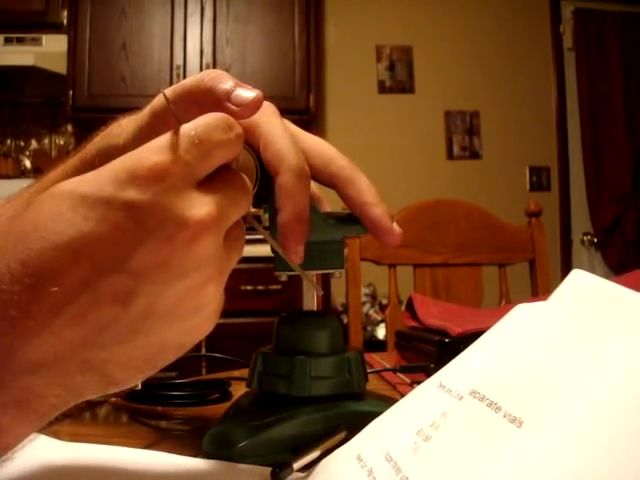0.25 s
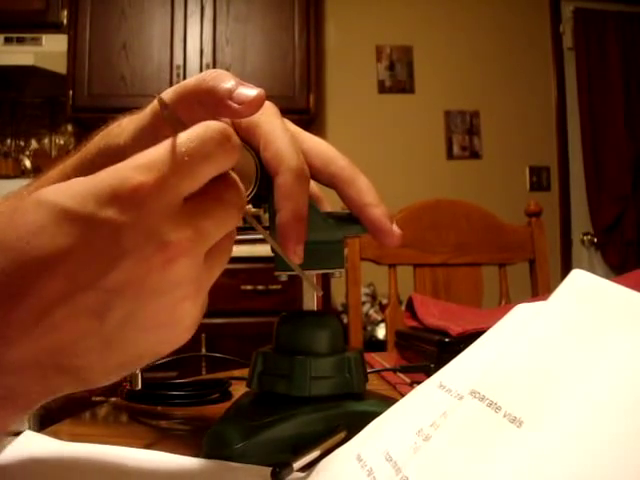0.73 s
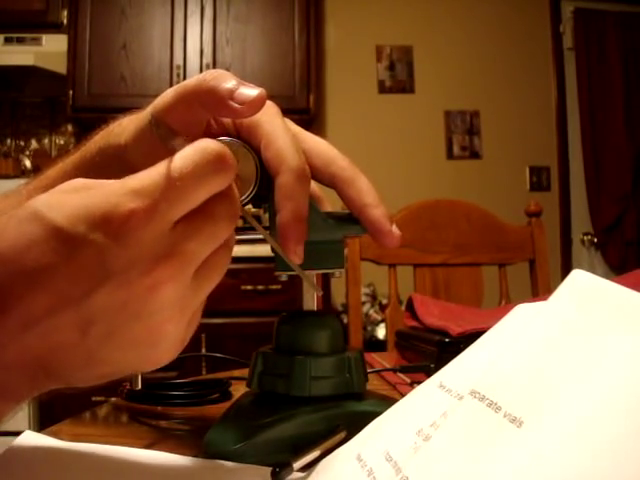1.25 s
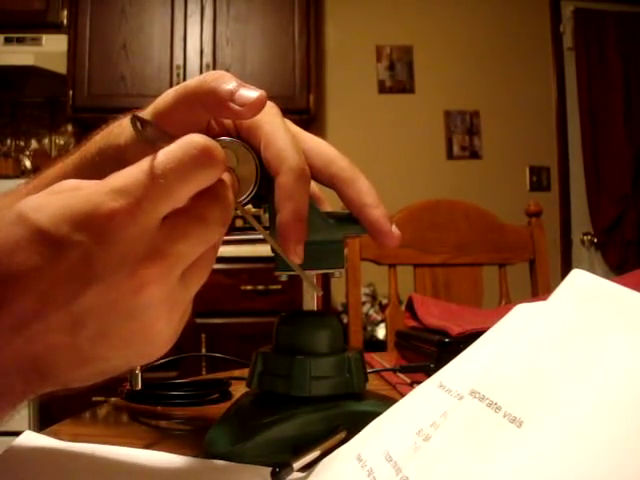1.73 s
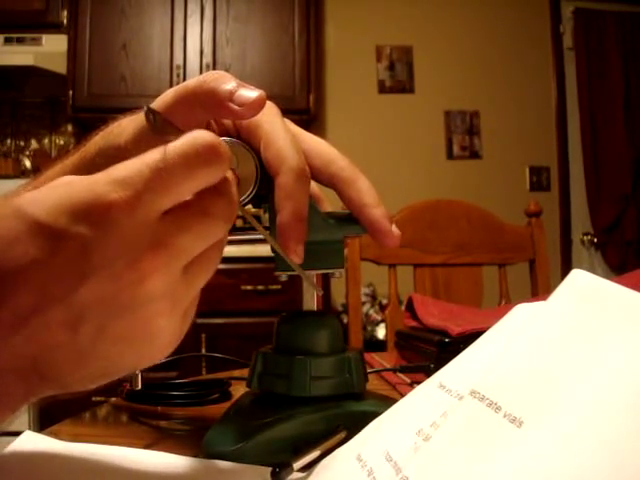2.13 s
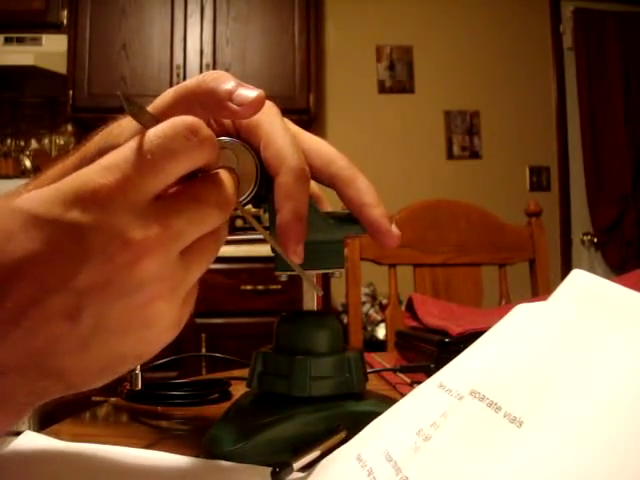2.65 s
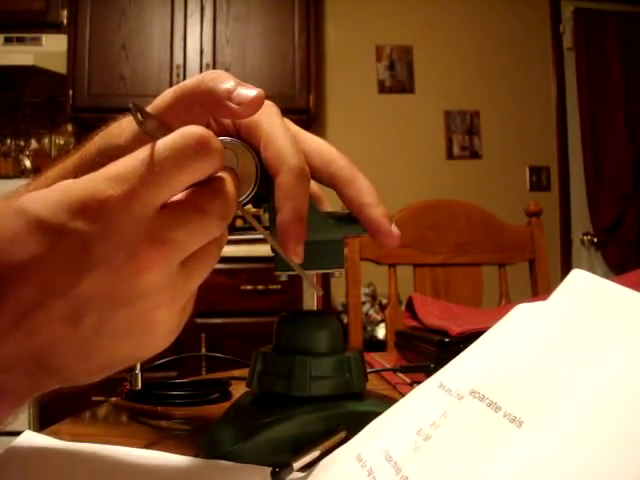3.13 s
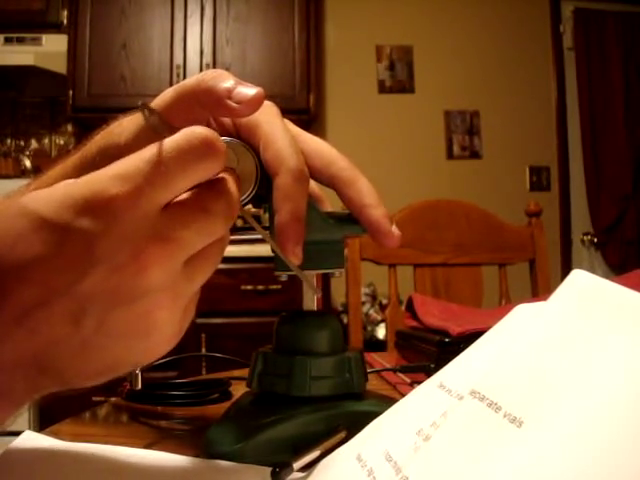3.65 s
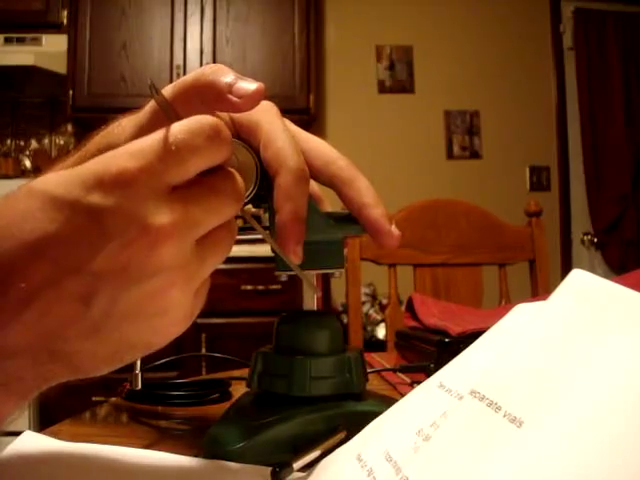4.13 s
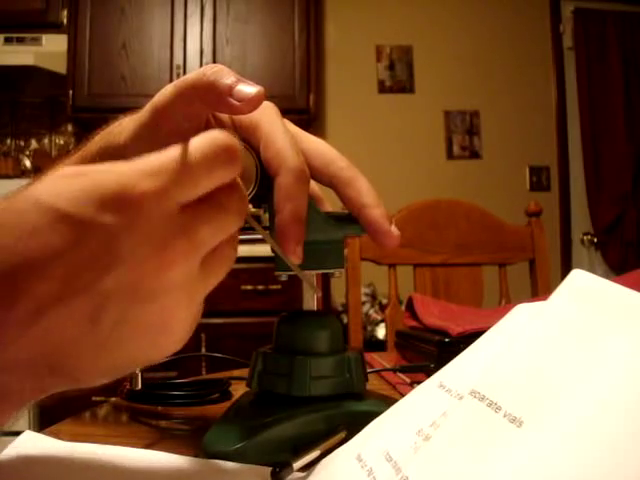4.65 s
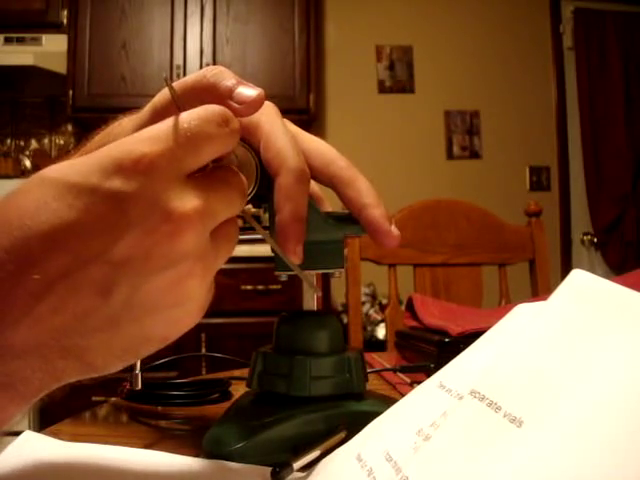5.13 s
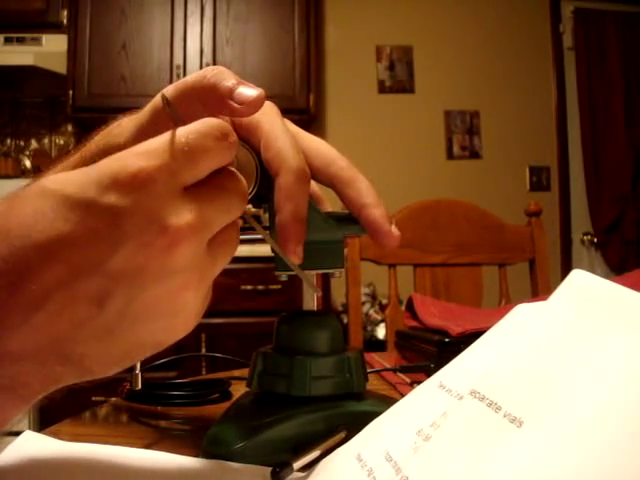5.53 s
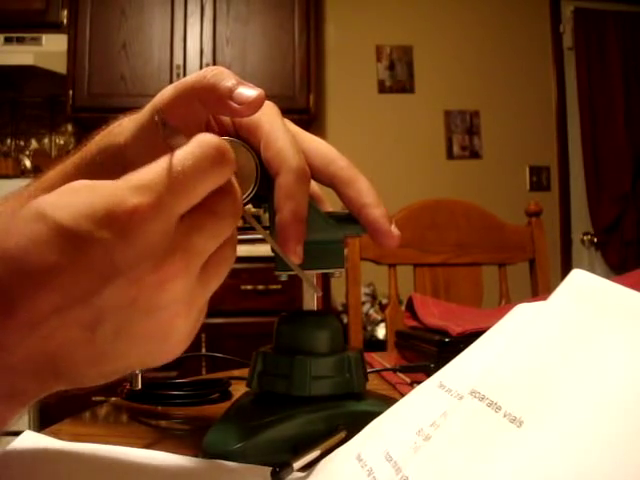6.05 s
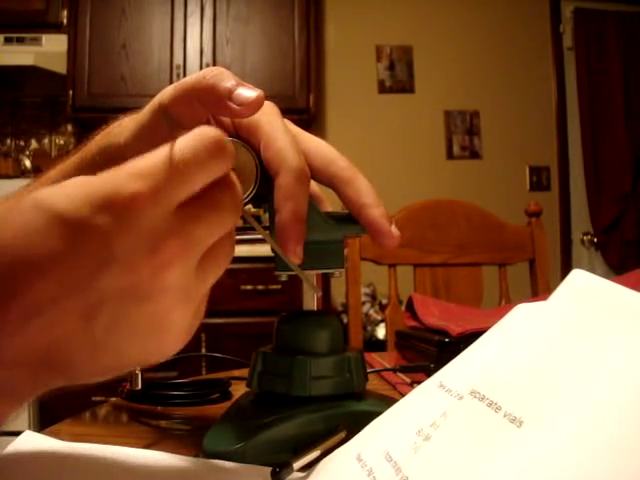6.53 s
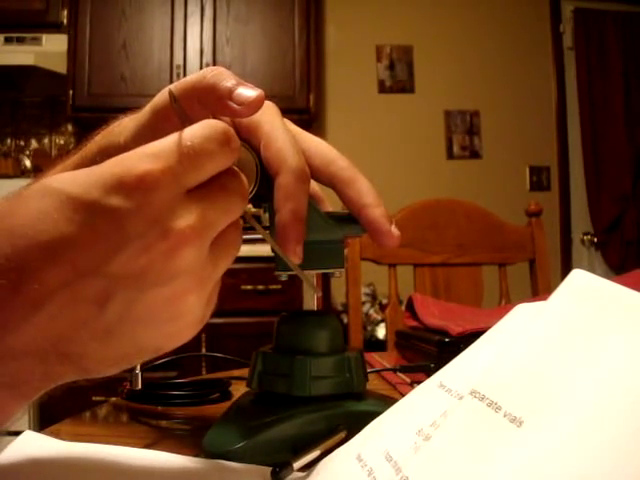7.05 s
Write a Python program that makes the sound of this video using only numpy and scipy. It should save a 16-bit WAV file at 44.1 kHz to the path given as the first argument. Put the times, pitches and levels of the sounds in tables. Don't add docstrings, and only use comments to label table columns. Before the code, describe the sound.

Close, sparse metallic ticks and a few hard clicks from lock picking, while a refrigerator hums and a clock softly rattles each second.

```python
import sys
import numpy as np
from scipy import signal
from scipy.fft import rfft, irfft, next_fast_len
from scipy.io import wavfile
from scipy.ndimage import uniform_filter1d, map_coordinates

SR = 44100
rng = np.random.default_rng(int(sys.argv[2]) if len(sys.argv) > 2 else 0)


def master_out(mix):
    frames = np.transpose(np.atleast_2d(mix))
    ceiling = np.clip(frames, -1, 1)
    pcm = np.round(ceiling * 32767).astype(np.int16)
    wavfile.write(sys.argv[1], SR, pcm)


def makeup_ratio(level_db):
    decades = np.asarray(level_db, float) / 20
    return 10 ** decades


N = 321930


def along(points, hz):
    f, value = np.transpose(points)
    return np.interp(np.log(hz + 1), np.log(f + 1), value)


def filtered(x, response):
    m = next_fast_len(N + SR // 2)
    return irfft(rfft(x, m) * response(np.fft.rfftfreq(m, 1 / SR)), m)[:N]


def rung(x, modes):
    def response(f):
        total = 0
        for k, (center, width, db) in enumerate(modes):
            damping = 1j * f * width
            total = total + (-1) ** k * makeup_ratio(db) * damping / (center ** 2 - f ** 2 + damping)
        return total
    return filtered(x, response)


def taps(times_s, db):
    return np.bincount(np.round(times_s * SR).astype(int), makeup_ratio(db), N)


def contacts(rows, decay_s):
    force, t = np.zeros(N + SR), np.arange(SR // 20) / SR
    for s, db in rows:
        push = rng.standard_normal(len(t)) * np.exp(-t / decay_s)
        force[round(s * SR):][:len(t)] += makeup_ratio(db) * push / np.linalg.norm(push)
    return force[:N]


def wobble(rate):
    return map_coordinates(rng.standard_normal(int(N * rate / SR) + 4), [np.arange(N) * rate / SR])


# start in s, peak in dB, depth (0 steel, 1 jaws, 2 table), run-up in s.
SET_KNOCKS = [
    (1.5645, -50, .1, 0),
    (1.5663, -24.5, 0, 0),
    (1.5693, -41, .9, 0),
    (1.5745, -44, .2, 0),
    (1.5785, -42, .2, 0),
    (1.582, -42, .2, 0),
    (1.5855, -51, .9, 0),
    (1.5915, -42, .5, 0),
    (1.602, -48, .2, 0),
    (1.61, -49, .3, 0),
]
# center in Hz, width in Hz, level in dB.
SET_STEEL_MODES = [(2700, 400, -9), (3250, 300, 0), (3680, 250, -5), (4350, 350, -3), (4900, 400, -8),
                   (5750, 450, -1), (6700, 600, -11), (8150, 400, -8), (8700, 500, -5), (9250, 300, -11)]
# center in Hz, width in Hz, level in dB.
SET_JAW_MODES = [(480, 150, 0), (1130, 200, 2), (1450, 300, 7.5), (2060, 300, 2)]
# center in Hz, width in Hz, level in dB.
TABLE_MODES = [(133, 19.5, 6), (244.8, 56, 0), (356, 42.5, -6), (548, 172, -6.5), (721, 297, -13)]


def pin_set():
    return blow(SET_KNOCKS, SET_STEEL_MODES, SET_JAW_MODES, TABLE_MODES, steel_wet_db=-7.5, wet_db=-8)


# start in s, peak in dB, depth (0 steel, 1 jaws, 2 table), run-up in s.
SLIP_KNOCKS = [(1.9745, -45, 1.1, 0), (1.979, -50, 1.1, 0), (1.9852, -43, .3, 0), (1.9872, -46, .9, 0),
               (1.9893, -42, .1, .004), (1.99, -36, 0.1, 0), (1.9915, -26.5, .3, 0), (1.9955, -41, .7, 0),
               (1.9975, -43, .5, 0), (2.0005, -33, 1.2, 0), (2.0025, -31.5, 1.2, 0), (2.0045, -31, 2, 0),
               (2.009, -43, .1, 0), (2.0115, -40, 1.7, 0), (2.0145, -31, 2, 0), (2.0165, -44, .6, 0),
               (2.022, -46, 1.3, 0), (2.026, -39, 1.6, 0), (2.037, -46, 1.4, 0), (2.049, -45, 1.5, 0)]
# center in Hz, width in Hz, level in dB.
SLIP_STEEL_MODES = [(2700, 600, -6), (3400, 300, 1), (3850, 350, 4), (4400, 300, -2), (5000, 200, -8),
                    (5450, 250, -4), (5850, 250, -4), (6600, 600, -10), (8600, 900, -13), (9930, 250, -5)]
# center in Hz, width in Hz, level in dB.
SLIP_JAW_MODES = [(620, 250, -4), (1120, 200, 7), (1480, 400, 4.5), (2110, 170, 5.5)]


def pick_slip():
    return blow(SLIP_KNOCKS, SLIP_STEEL_MODES, SLIP_JAW_MODES, TABLE_MODES, steel_wet_db=-7, wet_db=-7.5)


# start in s, peak in dB, depth (0 steel, 1 jaws, 2 table), run-up in s.
SNAP_KNOCKS = [(3.388, -52, .2, 0), (3.3903, -35, .1, 0), (3.3911, -22.5, .3, 0), (3.392, -34, 2, 0),
               (3.3942, -32, .6, 0), (3.401, -46, .3, 0), (3.406, -34, 1.95, 0), (3.408, -48, .3, 0),
               (3.4115, -34, 1.9, 0), (3.4155, -48, .2, 0), (3.4165, -34, 2, 0), (3.4205, -50, .6, 0),
               (3.424, -35, 1.95, 0), (3.435, -41, 1.9, 0), (3.446, -53, .5, 0), (3.482, -53, .5, 0)]
# center in Hz, width in Hz, level in dB.
SNAP_STEEL_MODES = [(3250, 300, 7), (3680, 350, 7.5), (4780, 350, 4.5), (5300, 150, -3), (5580, 220, 1),
                    (6150, 250, -4), (6550, 200, -10), (7050, 200, -11), (7700, 350, -1), (8250, 300, 3.5),
                    (9000, 500, -12), (9750, 280, 2)]
# center in Hz, width in Hz, level in dB.
SNAP_JAW_MODES = [(820, 220, 1), (1100, 200, -1), (1570, 180, 8.5), (1960, 220, -1), (2350, 200, -4),
                  (2650, 200, -2)]
# center in Hz, width in Hz, level in dB.
SNAP_TABLE_MODES = [(133, 19.5, 6), (244.8, 56, -3), (356, 70, -2.5), (548, 172, -8), (950, 297, -13)]


def spring_snap():
    return blow(SNAP_KNOCKS, SNAP_STEEL_MODES, SNAP_JAW_MODES, SNAP_TABLE_MODES, steel_wet_db=-10, wet_db=-7)


# start in s, peak in dB, depth (0 steel, 1 jaws, 2 table), run-up in s.
SCRAPE_KNOCKS = [
    (6.599, -55, .6, 0),
    (6.604, -45, 1, 0),
    (6.633, -43, .2, 0),
    (6.636, -39.5, .2, 0),
    (6.639, -43, 1, 0),
    (6.648, -45, 1.14, 0),
    (6.657, -48, 1.1, 0),
]
# center in Hz, width in Hz, level in dB.
SCRAPE_STEEL_MODES = [(2100, 500, -5), (3500, 900, -3), (4800, 800, 1), (8300, 900, -6)]
# center in Hz, width in Hz, level in dB.
SCRAPE_JAW_MODES = [(950, 300, -1), (1400, 350, 1)]


def pick_scrape():
    return blow(SCRAPE_KNOCKS, SCRAPE_STEEL_MODES, SCRAPE_JAW_MODES, TABLE_MODES, steel_wet_db=-5, wet_db=-4.5)


def blow(rows, steel, jaws, table, steel_wet_db, wet_db):
    jaw_lag_s = .0009
    s, steel_db, jaw_db, table_db = np.transpose(knocks(rows))
    rub = makeup_ratio(-11) * contacts(zip(s, steel_db), decay_s=.0016)
    bright = makeup_ratio(28) * rung(taps(s, steel_db) + rub, steel)
    dull = makeup_ratio(34) * rung(taps(s + jaw_lag_s, jaw_db), jaws)
    dull = dull + makeup_ratio(43.5) * rung(taps(s + jaw_lag_s, table_db), table)
    return bright + dull + kitchen(makeup_ratio(steel_wet_db) * bright + makeup_ratio(wet_db) * dull, delay_s=.005)


def knocks(rows):
    up_db, down_db = 19, 12
    slips, run_up_db, swell_db = 4, -3, .6
    part = np.arange(3)
    out = []
    for s, db, deep, run_s in rows:
        loss_db = np.maximum(up_db * (deep - part), down_db * (part - deep))
        out.append((s, *(db - loss_db)))
    for s, db, deep, run_s in rows:
        if run_s:
            for k in range(1, slips + 1):
                out.append((s - run_s * k / slips, *(db + run_up_db - swell_db * k - up_db * part)))
    return out


# start in s, frequency in Hz, level in dB, t60 in s.
RING_MODES = [(3.398, 8131, -47, .3), (3.398, 8340, -51, .3), (3.398, 9950, -42, .08),
              (3.398, 9630, -50, .2), (3.398, 7600, -47, .1), (3.396, 2555, -44.5, .3),
              (3.4, 3220, -47, .35), (3.4, 3480, -49, .25), (3.4, 1980, -47, .3), (3.396, 4190, -50, .3),
              (3.396, 4950, -52, .3), (3.396, 5580, -49, .3), (3.396, 6460, -54, .3),
              (3.396, 1120, -46, .35), (1.995, 4390, -54, .3), (2.003, 2035, -47, .3),
              (2.003, 820, -45, .3), (2.003, 1150, -47, .3), (2.003, 544, -44, .4), (1.572, 1350, -44, .27),
              (1.571, 4370, -56, .18), (1.571, 3230, -47.5, .2), (1.571, 2640, -55, .3),
              (1.572, 9870, -50, .1)]


def springs():
    rise_s, flutter_db, flutter_per_s, drift_rad = .002, 5, 170, 2.1
    out, t = np.zeros(N + SR), np.arange(SR // 2) / SR
    for s, hz, db, t60_s in RING_MODES:
        shake, wander = [map_coordinates(knots, [t * flutter_per_s]) for knots in rng.standard_normal((2, 100))]
        size = makeup_ratio(db + flutter_db * shake - 60 * t / t60_s) * (1 - np.exp(-t / rise_s))
        out[round(s * SR):][:len(t)] += size * np.sin(2 * np.pi * hz * t + drift_rad * wander)
    return out[:N]


# start in s, peak in dB, ring in Hz, rub in dB.
PIN_TICKS = [(.44, -47, 3670, -16.5), (1.513, -43, 3730, -18.5), (1.7664, -47.5, 3670, -19),
             (1.8793, -32, 3553, -18), (1.8845, -44, 3600, -24), (1.973, -35, 3780, -12),
             (2.3372, -40, 2060, -17.5), (2.6127, -42.5, 3540, -18), (4.428, -39.5, 3800, -13.5),
             (4.439, -49, 3700, -22), (5.6282, -43, 3630, -17), (6.299, -43, 3570, -18),
             (6.3364, -47.5, 3560, -20), (6.6323, -49, 3500, -23), (6.6358, -47, 4700, -23),
             (7.0555, -43, 2640, -19)]
# center in Hz, width in Hz, level in dB.
PIN_TOP_MODES = [(1700, 900, -2), (3300, 1200, -6), (4500, 1200, -5), (5800, 1500, -8), (8000, 1600, -7),
                 (9600, 900, -12)]


def pins():
    out, t = np.zeros(N + SR), np.arange(SR // 50) / SR
    age = t / .00055
    for s, db, hz, rub_db in PIN_TICKS:
        out[round(s * SR):][:len(t)] += makeup_ratio(db) * age * np.exp(1 - age) * np.sin(2 * np.pi * hz * t)
    rub = contacts([(s, rub_db) for s, db, hz, rub_db in PIN_TICKS], decay_s=.0028)
    return out[:N] + rung(rub, PIN_TOP_MODES)


# case in dB, gears in dB.
CLOCK_BEATS = [(-46.5, -54), (-48.5, -53), (-47.5, -53.5), (-47.5, -55), (-49, -55), (-54, -58), (-53, -56),
               (-54, -57)]
# offset in s, level in dB.
STEP_CONTACTS = [
    (-.004, -7),
    (.002, 1),
    (.014, 0),
    (.023, -3),
    (.039, 0),
    (.052, -3),
    (.074, -5),
    (.095, -8),
]
# center in Hz, width in Hz, level in dB.
CASE_MODES = [(560, 200, -11), (1200, 260, -8), (2240, 190, 0.5), (2500, 400, -7), (3250, 700, -13)]
# center in Hz, width in Hz, level in dB.
GEAR_MODES = [(4400, 200, 0), (4820, 300, -3), (5500, 500, -10), (5950, 250, -5), (6470, 320, -2),
              (7200, 700, -7)]


def clock():
    first_s, period_s = .2, .9993
    case_db, gear_db = np.transpose(CLOCK_BEATS)
    starts_s = first_s + period_s * np.arange(len(CLOCK_BEATS))

    def rattle(levels_db):
        rows = []
        for s, db in zip(starts_s, levels_db):
            for offset_s, part_db in STEP_CONTACTS:
                rows.append((s + offset_s, db + part_db + rng.normal(0, 2.5)))
        return contacts(rows, decay_s=.012)

    step = makeup_ratio(36.5) * (rung(rattle(case_db), CASE_MODES) + rung(rattle(gear_db), GEAR_MODES))
    return makeup_ratio(.5) * step + makeup_ratio(2) * kitchen(step, delay_s=.005)


# frequency in Hz, t60 in s.
KITCHEN_T60 = [(150, .4), (1000, 0.394), (3000, 0.314), (6000, 0.334), (10000, 0.398)]


def kitchen(x, delay_s):
    build_s = .008
    hz, t, z = signal.stft(rng.standard_normal(SR // 2), SR, nperseg=256)
    decay = makeup_ratio(-60 * t / along(KITCHEN_T60, hz)[:, None])
    tail = signal.istft(z * decay, SR, nperseg=256)[1]
    tail = tail * (1 - np.exp(-np.arange(len(tail)) / SR / build_s))
    delayed = np.pad(x, (round(delay_s * SR), 0))
    return signal.fftconvolve(delayed, tail / np.linalg.norm(tail))[:N]


MOTOR_LINES = {(1, -1): (-79.5, 2), (1, 2): (-79.5, 1.7), (1, 0): (-60.5, 0.46), (1, 1): (-55, 0.44),
               (2, -1): (-63.5, 1), (2, 0): (-70, 2.4), (2, 1): (-58, 1.2), (2, 2): (-61, 0.99),
               (3, -1): (-66.5, 1.8), (3, 0): (-71, 2.3), (3, 1): (-77.5, 2.4), (4, 0): (-71.5, 1.6)}


def refrigerator():
    pull_hz, shaft_hz = 119.91, 29.036
    t, out = np.arange(N) / SR, np.zeros(N)
    for (pull, turns), (db, shake_db) in MOTOR_LINES.items():
        cycles = (pull * pull_hz + turns * shaft_hz) * t + rng.random()
        out += np.sqrt(2) * makeup_ratio(db + shake_db * wobble(4)) * np.sin(2 * np.pi * cycles)
    return out


# frequency in Hz, density in dB per Hz.
AIR_SPECTRUM = [(20, -23.5), (70, -20), (125, -8), (330, -1), (720, -3.5), (2410, -12), (8030, -19),
                (10200, -22)]


def air():
    steady_db, settle_db, settle_s = -49, 6, .037
    rush = filtered(rng.standard_normal(N), lambda hz: makeup_ratio(along(AIR_SPECTRUM, hz)))
    level_db = steady_db + settle_db * np.exp(-np.arange(N) / SR / settle_s)
    return rush / np.std(rush) * makeup_ratio(level_db + .34 * wobble(7.2))


def scene():
    ticks = pins()
    lock = pin_set() + pick_slip() + spring_snap() + pick_scrape() + springs()
    lock = lock + ticks + makeup_ratio(-5.5) * kitchen(ticks, delay_s=.008)
    lock = filtered(lock, lambda hz: (1j * hz / (1j * hz + 95)) ** 3)
    return (lock + clock() + refrigerator() + air())[None]


# frequency in Hz, range in dB.
KEPT_RANGE = [(1200, 45), (1800, 24), (3500, 17), (5200, 11), (9000, 10), (9700, 16), (10300, 16)]


def starved(z, hz, t):
    frame_s, frame_start_s = .03605, .0134
    loss_slope, hole_db, scatter_db = 3.5, -36, 2
    power = uniform_filter1d(uniform_filter1d(abs(z) ** 2, size=3, axis=0), size=3, axis=1)
    level_db = 10 * np.log10(power + 1e-16)
    frame = ((t + frame_s - frame_start_s) // frame_s).astype(int)
    frame_starts = np.flatnonzero(np.diff(frame, prepend=-1))
    peak_db = np.maximum.reduceat(np.roll(level_db, 2, axis=1), frame_starts, axis=1)
    chance = rng.standard_normal(peak_db.shape)[np.arange(len(hz)) // 2]
    edge_db = (peak_db - along(KEPT_RANGE, hz)[:, None] + scatter_db * chance)[:, frame]
    return makeup_ratio(np.clip(loss_slope * (level_db - edge_db), hole_db, 0))


def low_pass(x):
    return signal.sosfilt(signal.butter(12, 11040, fs=SR, output="sos"), x)


def record(dry):
    top_hz = 10130
    hz, t, z = signal.stft(dry[0], SR, nperseg=128, noverlap=96)
    z = z * starved(z, hz, t)
    blocks = rng.random((len(hz) // 2 + 1, len(t) // 8 + 1))
    blocks = blocks.repeat(2, 0).repeat(8, 1)[:len(hz), :len(t)]
    z = z * np.where(blocks < .1 * (hz[:, None] > 4800), makeup_ratio(-25), 1)
    kept = signal.istft(z, SR, nperseg=128, noverlap=96)[1][:N]
    mix = filtered(kept, lambda f: f < top_hz)[None]
    return low_pass(mix)


dry = scene()
out = record(dry)
master_out(out)
```